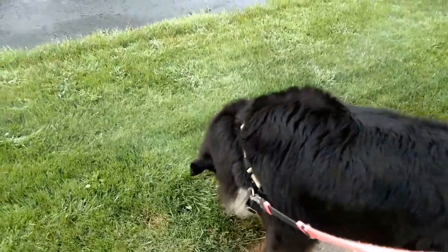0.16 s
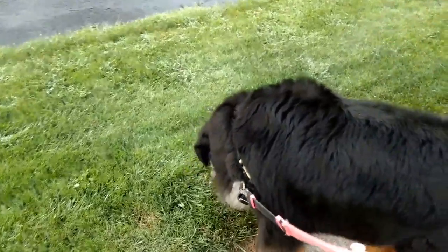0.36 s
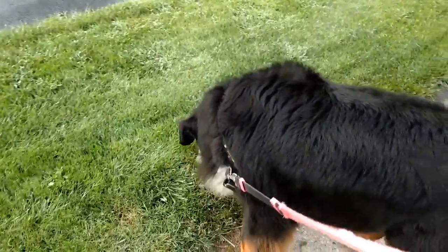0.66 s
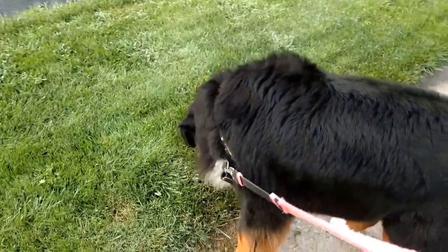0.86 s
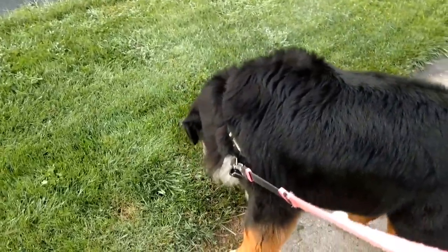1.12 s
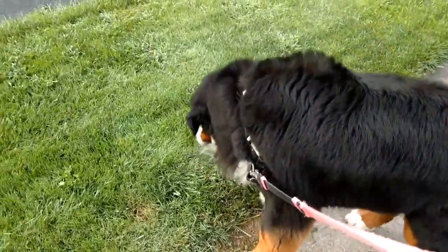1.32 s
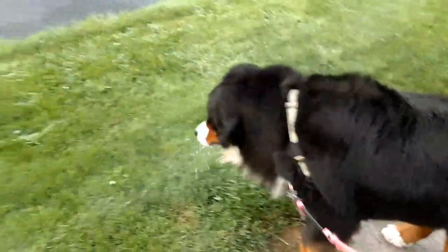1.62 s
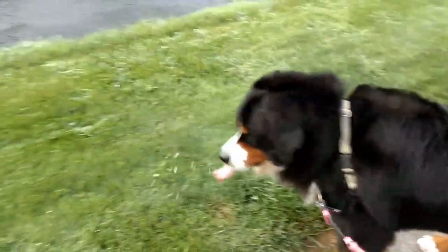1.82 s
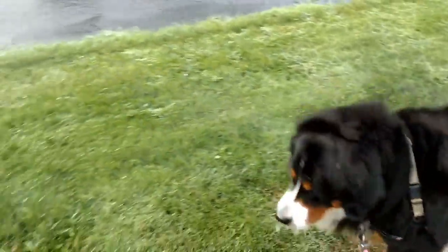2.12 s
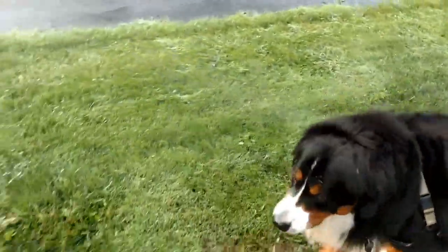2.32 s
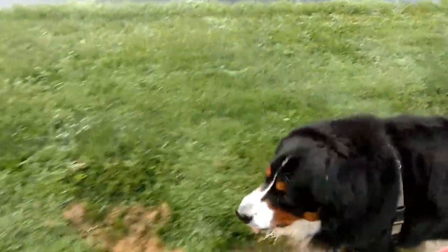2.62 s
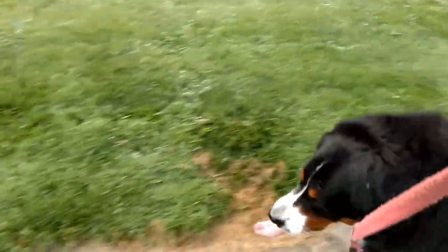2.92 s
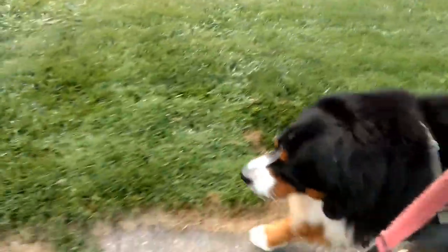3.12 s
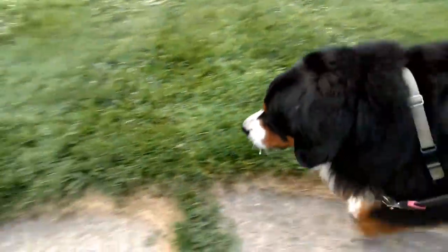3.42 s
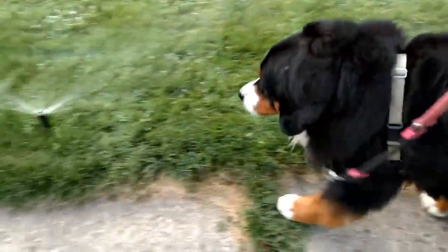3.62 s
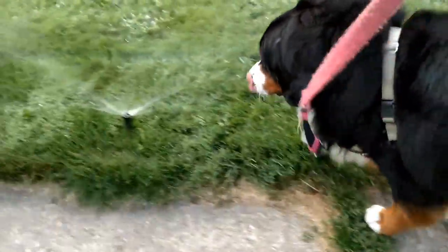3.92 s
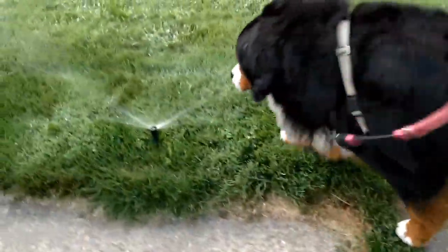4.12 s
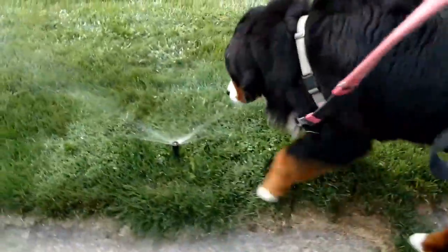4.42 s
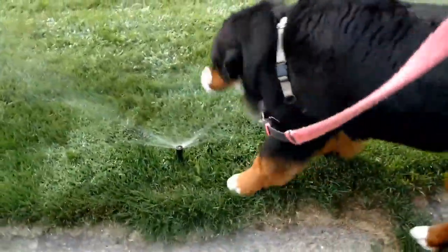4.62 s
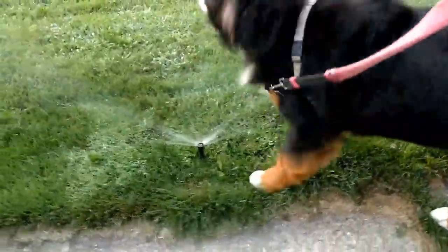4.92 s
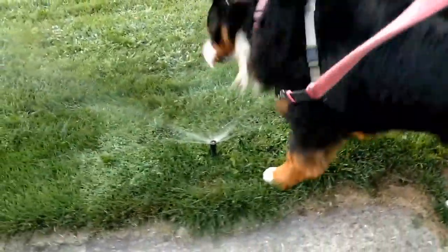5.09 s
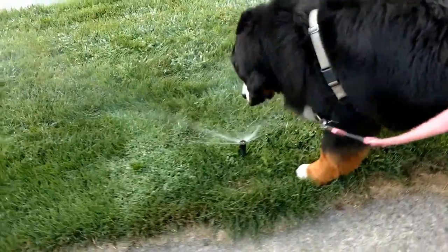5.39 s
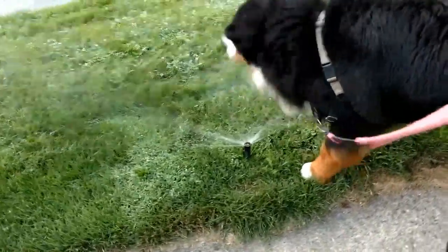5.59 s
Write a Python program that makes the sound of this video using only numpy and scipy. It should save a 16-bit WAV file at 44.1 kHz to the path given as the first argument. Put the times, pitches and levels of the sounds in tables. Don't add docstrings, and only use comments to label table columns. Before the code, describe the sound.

Close handheld stereo pickup of fine sprinkler spray, a constant airy hiss that starts toward the left and moves to the centre as the microphone turns. Early on, wet mouth plops, gurgles and dry snaps from a dog drinking; then wind bumps and handling thuds, sparse footfalls, and finally several bright, thin tag rattles. Distant traffic hums softly below.

```python
import sys
import numpy as np
from scipy import signal
from scipy.fft import rfft, irfft, next_fast_len
from scipy.io import wavfile

SR = 44100
rng = np.random.default_rng(int(sys.argv[2]) if len(sys.argv) > 2 else 0)


def how_loud(loudness_db):
    steps = np.asarray(loudness_db, float) / 20
    return 10 ** steps


def log_audio(samples):
    frames = np.atleast_2d(samples).T
    limited = np.clip(frames, -1, 1)
    pcm = np.round(limited * 32767).astype(np.int16)
    wavfile.write(sys.argv[1], SR, pcm)


N = 253575
FRAME_HZ = np.fft.rfftfreq(512, 1 / SR)[:, None]
FRAME_S = np.arange(N // 128 + 2) * 128 / SR
STEER_MS = 0.463


def curves(rows, at_s):
    s, *columns = np.transpose(rows)
    return [np.interp(at_s, s, c) for c in columns]


def in_time(rows):
    return curves(rows, np.arange(N) / SR)


def in_frames(rows):
    return curves(rows, FRAME_S)


def swells(rows, s):
    at, half, *lifts = np.transpose(rows)
    bells = np.exp(-((s[:, None] - at) / half) ** 2)
    return [bells @ db for db in lifts]


def at_hz(points, hz):
    points = np.array(points)
    return np.interp(np.log(hz + 1), np.log(points[:, 0]), points[:, 1])


def bump(hz, width):
    return np.exp(-(np.log((FRAME_HZ + 1) / hz) / width) ** 2)


def rms_one(x):
    return x / np.sqrt(np.mean(x ** 2) + 1e-20)


def drift(rate):
    r = np.exp(-80 * np.pi * rate / SR)
    slow = signal.lfilter([1], [1, -2 * r, r * r], rng.standard_normal(N // 40 + 2002))[2000:]
    return np.interp(np.arange(N) / 40, np.arange(len(slow)), rms_one(slow))


def ring(clicks, hz, t60):
    r, w = how_loud(-60 / (t60 * SR)), 2 * np.pi * hz / SR
    return signal.lfilter([0, np.sin(w)], [1, -2 * r * np.cos(w), r * r], clicks + 1e-18)


def grainy(size, spread_db):
    sizes_db = spread_db * np.clip(rng.standard_normal(size), -3.0, 3.0)
    return rms_one(rng.standard_normal(size) * how_loud(sizes_db))


# (f/Hz, coherence 0-1)
LIKENESS = [(40, 1), (100, 0.98), (200, 0.97), (330, 0.93), (800, 0.28), (1500, 0.43), (3000, 0.08),
            (6000, 0.26), (12000, 0)]


def diffuse(spread_db):
    mid, side = rfft(grainy((2, N), spread_db))
    alike = np.clip(at_hz(LIKENESS, np.fft.rfftfreq(N, 1 / SR)), 0, 1)
    ports = np.sqrt(1 + alike) * mid + np.sqrt(1 - alike) * side * [[1], [-1]]
    return irfft(ports, N) / np.sqrt(2)


# (t/s, left port lead/ms, direct share 0-1, ground echo delay/ms)
BEARING = [(0, 0.41, 0.52, 0.11), (1.9, 0.4, 0.39, 0.16), (2.7, 0.39, 0.56, 0.18), (3.1, 0.31, 0.64, 0.16),
           (3.5, 0.19, 0.5, 0.26), (3.62, 0.14, 0.74, 0.77), (3.77, 0.068, 0.54, 0.72),
           (4.25, 0.051, 0.35, 0.69), (4.4, 0.018, 0.4, 0.624), (4.75, -0.039, 0.44, 0.54),
           (5.0, -0.029, 0.58, 0.23), (5.75, -0.084, 0.88, 0.13)]
# (f/Hz, level/dB)
SCATTER = [(1500, -3.5), (6000, -3.5), (8000, 2), (15000, 4)]


def from_nozzle(spread_db, echo=0.18):
    lead_ms, share, echo_ms = in_time(BEARING)
    size = next_fast_len(N + 200)
    fine = signal.resample(grainy(size, spread_db), 4 * size)

    def late(ms):
        return np.interp(4 * (np.arange(N) + 100 - ms * SR / 1000), np.arange(len(fine)), fine)

    ports = []
    for side in (-1, 1):
        delay_ms = side * lead_ms / 2
        ports.append(late(delay_ms) + echo * late(delay_ms + echo_ms))
    share = np.clip(share, 0, 1)
    tilt = how_loud(at_hz(SCATTER, np.fft.rfftfreq(N, 1 / SR)))
    scattered = irfft(rfft(diffuse(spread_db)) * tilt, N)
    return np.sqrt(share) * rms_one(np.array(ports)) + np.sqrt(1 - share) * scattered


def coloured(white, gain, gusty_db):
    frames = signal.stft(white, nperseg=512, noverlap=384)[2]
    frames = frames * gain[..., :frames.shape[-1]]
    shaped = signal.istft(frames, nperseg=512, noverlap=384)[1][:, :N]
    return shaped * how_loud(gusty_db * (drift(3.75) + 0.6 * drift(50)))


def patches(spectrum, patchy_db, count):
    ends = [spectrum[0][0], spectrum[-1][0]]
    place = np.interp(np.log(FRAME_HZ + 1), np.log(ends), [0, count - 1])
    at = np.minimum(np.arange(len(FRAME_S)) * 128, N - 1)
    flicker = 0
    for k in range(count):
        band = np.clip(1 - abs(place - k), 0, 1)
        flicker = flicker + band * (drift(1.7) + drift(29.0))[at]
    shape_db = at_hz(spectrum, FRAME_HZ)
    return shape_db - 10 * np.log10(np.mean(how_loud(2 * shape_db))) + patchy_db * flicker


# (t/s, level/dB)
SPRAY = [(0, -43.5), (0.7, -43.5), (1.07, -47), (1.4, -43.5), (2.24, -43), (3.38, -39), (4.1, -41.5),
         (4.6, -39), (5.75, -38.5)]
# (f/Hz, density/dB per Hz)
MIST = [(5000, -10.5), (6500, -3.5), (7500, -3.5), (8300, 0.5), (9500, -1), (11000, -1), (12000, -2),
        (13300, -0.5), (14500, -0.5), (15200, 0), (16500, 2)]
# (f/Hz, density/dB per Hz)
SPLASH = [(1200, 4), (1800, 2), (2300, -1), (3000, 1.5), (3700, 3), (4300, 3), (5300, -2.5), (6300, -6.5),
          (7500, -7), (9000, -30)]
# (t/s, half length/s, splash lift/dB, patter lift/dB)
SWEEPS = [
    (0.25, 0.41, 0.5, 1),
    (0.75, 0.45, 5, -6.5),
    (1.2, 0.28, -3.5, 7.5),
    (1.45, 0.31, 7, -6.5),
    (2.0, 0.48, 0.5, 4.5),
    (2.62, 0.16, -1, 1),
    (3.05, 0.27, 2, 1),
    (3.75, 0.19, 4, 0),
    (4.23, 0.33, 3, 2.5),
    (4.68, 0.066, 3.5, 0),
]
# (t/s, f/Hz, lift/dB)
LOBE = [(0, 7600, -6), (0.6, 7550, -3), (1.6, 7500, -1.5), (3.65, 8400, -4), (3.85, 7800, 7),
        (4.0, 8000, 10), (4.3, 7900, 7.5), (4.5, 8050, 6), (4.7, 7800, 6), (5.2, 7600, 3), (5.75, 8200, -3)]
SECOND_LOBE = [(0, 10100, 4.5), (0.7, 9800, 2), (1.7, 9800, 5), (2.45, 9350, 2.5), (2.95, 8800, -3),
               (3.35, 9300, 0), (3.75, 9700, 8), (4.0, 9400, 2.8), (4.3, 9400, 5), (5.75, 9500, -1)]
THIRD_LOBE = [(0, 11800, 1), (1.2, 11200, 2.5), (1.8, 12000, 3.5), (2.6, 11700, 6), (2.9, 11900, 4),
              (3.15, 11400, 7.5), (3.3, 11500, 2.5), (3.45, 11100, 4.5), (3.85, 11000, 5), (4.1, 11000, 0),
              (4.5, 11000, 7.5), (4.8, 11000, 3), (5.75, 11600, -3)]
TOP_LOBE = [(0, 12600, 3), (0.9, 13700, 5.5), (1.3, 13700, 5), (1.85, 13400, 3), (2.4, 12900, 0),
            (2.7, 13000, 2), (2.9, 13800, 4), (3.25, 14300, 0), (3.6, 13000, -2.5), (3.95, 12600, 0),
            (4.7, 12600, 5), (5.75, 13200, -4)]
# (t/s, left-right level in the lower shadow/dB)
GRIP = [(0, 7), (0.9, 11), (1.55, 14), (1.85, 5.5), (3.0, 8), (3.3, 4), (4.7, 5.5), (5.75, 8.5)]


def spray():
    (mist_db,), (lower_db,) = in_frames(SPRAY), in_frames(GRIP)
    splash_db = -48.5 + swells(SWEEPS, FRAME_S)[0]
    upper_db = -2.5 + 9 * in_frames(BEARING)[0]
    lobes_db = 0
    for rows in (LOBE, SECOND_LOBE, THIRD_LOBE, TOP_LOBE):
        hz, lift_db = in_frames(rows)
        lobes_db = lobes_db + lift_db * bump(hz, 0.046)
    mist = how_loud(2 * (patches(MIST, 0.54, count=9) + mist_db + 3.0 + lobes_db))
    splash = how_loud(2 * (patches(SPLASH, 1.85, count=7) + splash_db - 0.5))
    shade_db = lower_db * bump(6530, 0.43) + upper_db * bump(12000, 0.23)
    gain = np.sqrt(mist + splash) * how_loud(np.multiply.outer([0.7, -0.7], shade_db))
    return coloured(from_nozzle(2.3), gain, gusty_db=1.02)


# (f/Hz, density/dB per Hz)
PATTER = [(150, -24), (280, 0.5), (450, -3.5), (800, -4.5), (1400, -10), (1800, -9.5), (2400, -33),
          (3200, -43)]
# (f/Hz, density/dB per Hz)
HUM = [(25, -8), (45, -14), (65, 1.5), (95, -0.5), (140, -2.5), (200, -5), (300, -16), (450, -33.5)]
# (t/s, half length/s, breeze lift/dB, far hum lift/dB)
GUSTS = [
    (1.1, 0.33, -2, 0.5),
    (2.72, 0.15, 13.5, 3),
    (2.86, 0.044, 13, 1),
    (2.98, 0.075, 18.5, 2),
    (3.4, 0.35, 4, 2.5),
    (4.0, 0.35, -7, 0.5),
    (4.7, 0.074, -13, 1),
]


def surroundings():
    (mist_db,) = in_frames(SPRAY)
    hum_db = -54 + swells(GUSTS, np.arange(N) / SR)[1]
    hum = irfft(rfft(diffuse(0)) * how_loud(at_hz(HUM, np.fft.rfftfreq(N, 1 / SR))), N)
    hum = rms_one(hum) * how_loud(hum_db + 10.5 + 0.087 * drift(6.1))
    follow_db = 0.67 * (mist_db - mist_db[0])
    patter_db = -48.5 + follow_db + swells(SWEEPS, FRAME_S)[1]
    patter = how_loud(patches(PATTER, 1.93, count=7) + patter_db - 3.5)
    return hum * how_loud([[0.6], [-0.6]]) + coloured(diffuse(5.2), patter, gusty_db=0.54)


def breeze():
    band = signal.butter(2, [45, 115], "band", fs=SR, output="sos")
    low = signal.sosfilt(band, rng.standard_normal((2, N)))
    gust_db = swells(GUSTS, np.arange(N) / SR)[0]
    return rms_one(low) * how_loud(-60.5 + gust_db + 2.0 * drift(6.3) + np.array([[0.8], [-0.8]]))


def knocks(rows, swell_s, rough, trim_db):
    out, t = np.zeros((2, N + 2048)), np.arange(2048) / SR
    noises = rng.standard_normal((len(rows), 2, 2048))
    tilts = rng.normal(0, 0.39, (len(rows), 1))
    for (s, peak_db, hz, t60), noise, tilt in zip(rows, noises, tilts):
        shape = (1 - np.exp(-t / swell_s)) * how_loud(-60 * (t / t60) ** 0.98)
        band = signal.butter(1, [0.73 * hz, 1.43 * hz], "band", fs=SR, output="sos")
        grit = rms_one(signal.sosfilt(band, noise))
        tone = (-np.sin(2 * np.pi * hz * t) + rough * grit) * shape / shape.max()
        thinning = 2 * abs(np.sin(np.pi * hz * STEER_MS / 1000)) + 0.66
        at = round((s + 0.001014) * SR)
        out[:, at:at + 2048] += how_loud(peak_db + trim_db) / thinning * tone * how_loud(tilt * [[1], [-1]])
    return out[:, :N]


# (t/s, peak level/dB, f/Hz, t60/s)
PLOPS = [(0.104, -30.5, 330, 0.012), (0.179, -45, 420, 0.012), (0.369, -36, 640, 0.018),
         (0.426, -35, 950, 0.026), (0.468, -34, 1090, 0.025), (0.641, -26.5, 536, 0.011),
         (0.669, -34, 770, 0.025), (0.753, -30, 664, 0.021), (0.946, -35, 620, 0.015),
         (0.992, -32, 781, 0.022), (1.042, -21, 728, 0.011), (1.005, -35.5, 1440, 0.018),
         (1.268, -36, 446, 0.041), (1.326, -30, 314, 0.018), (1.543, -37.5, 1220, 0.028),
         (1.631, -32.5, 1015, 0.029), (1.701, -15, 902, 0.012), (2.325, -33, 484, 0.016),
         (2.373, -27.5, 1434, 0.028), (2.631, -21.5, 486, 0.013), (2.705, -24, 516, 0.021),
         (2.752, -28, 356, 0.018), (2.793, -29, 820, 0.014), (2.948, -33, 530, 0.021),
         (3.2, -33.5, 466, 0.011), (4.782, -26, 666, 0.015), (5.008, -33, 643, 0.037),
         (5.688, -39, 550, 0.017)]
# (t/s, peak level/dB, f/Hz, t60/s)
SNAPS = [(0.732, -44, 670, 0.0053), (1.0705, -35, 3200, 0.003), (1.209, -22.5, 1370, 0.005),
         (1.2092, -34.5, 3200, 0.003), (1.1712, -33, 1240, 0.0033), (2.033, -24, 1250, 0.0045),
         (2.035, -36.5, 3000, 0.0067), (2.0348, -28, 1300, 0.0061), (2.0385, -30, 1010, 0.008),
         (3.66, -32, 350, 0.011), (4.1095, -23.5, 630, 0.013), (4.114, -33, 900, 0.006),
         (3.9, -28, 388, 0.005), (4.4122, -21.5, 1400, 0.0048), (4.4152, -21, 1340, 0.0062),
         (4.4414, -26, 1550, 0.0033), (4.4416, -32, 3100, 0.0033), (4.4465, -29, 1400, 0.005),
         (4.797, -19.5, 2560, 0.0063), (4.7965, -29, 3400, 0.004), (5.3, -27, 700, 0.0072),
         (5.3, -28, 1500, 0.0081), (4.8805, -23, 1540, 0.014), (4.8835, -22.5, 1800, 0.014),
         (5.7095, -23.5, 730, 0.011), (1.337, -40, 420, 0.0078), (5.19, -32, 900, 0.0023),
         (2.3735, -35, 1700, 0.008), (2.337, -32, 600, 0.01), (2.4005, -32, 700, 0.0023)]
# (t/s, peak level/dB, f/Hz, t60/s)
STRIKES = [
    (1.1712, -24.5, 1340, 0.0012),
    (1.174, -32.5, 3280, 0.0044),
    (2.1617, -29.5, 2600, 0.0029),
    (3.52, -45, 298, 0.011),
    (3.555, -30, 2800, 0.0026),
    (3.605, -30, 1720, 0.012),
    (4.11, -29, 3040, 0.0076),
    (4.8, -25, 1150, 0.0028),
    (5.01, -26, 1550, 0.0024),
    (5.69, -33, 328, .008),
]


def plops():
    wet = knocks(PLOPS, swell_s=0.011, rough=0.21, trim_db=0.5)
    dry = knocks(SNAPS, swell_s=0.0001, rough=0.36, trim_db=6.0)
    strikes = knocks(STRIKES, swell_s=0.0003, rough=0.3, trim_db=4.0)
    return wet + dry + strikes * [[1.6], [0.3]]


# (t/s, peak level/dB, centre f/Hz, half length/s)
SQUIRTS = [(0.322, -42, 5670, 0.017), (0.587, -41.5, 5860, 0.052), (0.804, -37, 5830, 0.023),
           (1.233, -34, 5050, 0.023), (1.254, -41.5, 7500, 0.044), (0.386, -39, 650, 0.031),
           (0.453, -37, 905, 0.022), (0.482, -38, 1060, 0.012), (0.71, -37.5, 900, 0.014),
           (.97, -34.5, 640, 0.073), (1.011, -39.5, 1440, 0.014), (1.472, -39, 1880, 0.011),
           (2.355, -30.5, 447, 0.051), (4.985, -32, 4140, .005), (2.017, -36.5, 2700, 0.0054),
           (2.329, -41.5, 5500, 0.004), (1.945, -40.5, 5400, 0.006), (5.66, -33, 4450, 0.0049)]
# (t/s, peak level/dB, centre f/Hz, half length/s)
BRUSHES = [
    (1.279, -36, 1660, 0.013),
    (4.789, -33.5, 1010, 0.0061),
    (4.796, -29.5, 5970, 0.0026),
    (5.012, -25.5, 1300, 0.0022),
    (5.198, -34, 7000, 0.0025),
]


def muzzle():
    power = 0
    for rows, width in ((SQUIRTS, 0.17), (BRUSHES, 0.54)):
        for s, db, hz, half in rows:
            burst = np.exp(-((FRAME_S - s) / half) ** 2)
            power = power + how_loud(2 * (db + 3.5)) * bump(hz, width) * burst
    ahead = grainy(N, 2.4) + how_loud(-15) * rng.standard_normal((2, N))
    return coloured(ahead, np.sqrt(power), gusty_db=1.5)


# (t/s, peak level/dB, f/Hz, t60/s)
BUBBLES = [
    (.388, -39, 720, .02),
    (.482, -36, 1050, 0.023),
    (.596, -41, 674, .02),
    (.695, -35, 700, .025),
    (.696, -39, 1030, .015),
    (1.0, -35, 875, .015),
    (1.022, -43, 1300, .025),
    (4.7985, -31, 3070, .012),
    (4.799, -24, 1460, 0.0087),
    (4.801, -32, 2540, 0.015),
]
# (t/s, peak level/dB, f/Hz, t60/s)
TICKS = [(1.217, -38, 5500, .003), (1.2365, -35, 5200, .004), (1.2462, -31, 5400, .003),
         (1.597, -30, 6000, 0.0037), (4.7965, -26, 9000, 0.0044), (4.8035, -30, 11000, .004),
         (4.8385, -37, 10000, .005), (4.864, -33, 8900, 0.0054), (4.977, -32, 8900, .004),
         (4.993, -37, 8500, .005), (5.0567, -43, 8000, .004), (5.139, -40, 8400, .004),
         (5.191, -36, 5200, .003), (5.1972, -26, 10000, .004), (5.2065, -30, 11000, .004),
         (5.214, -38, 14000, .004), (5.6548, -32, 10900, .004), (5.6585, -32, 10000, .004),
         (5.6708, -33, 11100, .004)]
# (t/s, peak level/dB, f/Hz, t60/s)
PAWS = [(4.779, -38, 424, 0.017), (4.836, -29, 540, 0.014), (4.838, -30, 1390, .008),
        (4.863, -31, 1500, .012), (4.918, -34.5, 310, 0.026), (4.975, -43, 720, .012),
        (5.0095, -28, 1300, 0.0055), (5.0115, -33, 710, .008), (5.016, -32, 300, .015),
        (5.121, -31.5, 285, 0.022), (1.268, -39, 400, .008)]
# (t/s, peak level/dB, mode f/Hz, t60/s)
PINGS = [(4.803, -38, 11900, .04), (4.887, -40, 12000, .03), (4.9155, -37, 14930, .05),
         (4.946, -40, 11900, .04), (4.9675, -28, 11920, .03), (4.968, -31, 14650, .035),
         (4.968, -38, 10470, .025), (4.957, -38, 14900, .03), (5.066, -37, 12100, .04),
         (5.067, -43, 10500, .08), (5.067, -42, 14730, .044), (5.131, -41, 14800, .04),
         (5.139, -38, 12110, 0.11), (5.672, -31, 11810, .09), (5.6712, -30, 10450, .025),
         (5.733, -44, 11900, .04)]


def contacts():
    bubbles = knocks(BUBBLES, swell_s=0.002, rough=0.16, trim_db=3.5)
    ticks = knocks(TICKS, swell_s=0.0001, rough=2.6, trim_db=2.0)
    paws = knocks(PAWS, swell_s=0.001, rough=0.37, trim_db=5.0)
    pings = knocks(PINGS, swell_s=0.0004, rough=0.06, trim_db=8.5)
    return bubbles + ticks + paws + pings


# (t/s, peak level/dB, membrane f/Hz)
PORT_HITS = [
    (2.1635, -13, 350),
    (2.1633, -18.5, 950),
    (2.4019, -19.5, 360),
    (5.689, -27, 342),
]


def port_hits():
    out, t = np.zeros((2, N + 1024)), np.arange(1024) / SR
    for s, peak_db, hz in PORT_HITS:
        at = round(s * SR)
        decay = np.exp(-(hz * t / 0.57) ** 2.4)
        out[1, at:at + 1024] -= how_loud(peak_db) * np.sin(2 * np.pi * hz * t) * decay
    return out[:, :N]


# (t/s, peak level/dB)
THUMPS = [
    (2.665, -48),
    (2.719, -50),
    (2.85, -47),
    (2.972, -57),
    (3.081, -31.5),
    (4.764, -58),
    (4.88, -49),
]


def thumps():
    clicks = np.zeros(N)
    clicks[[round(s * SR) for s, db in THUMPS]] = how_loud(np.array(THUMPS)[:, 1] + 25.5)
    return ring(ring(clicks, 90, 0.046), 126, 0.066) / 300 * [[1.3], [0.25]]


# (t/s, ringing level/dB, dull knock level/dB, loudest mode f/Hz)
TAGS = [(4.7971, -20.5, -19.5, 8300), (4.7975, -21, -38, 15000), (4.8024, -22, -25, 15000),
        (4.8035, -26, -55, 11900), (4.8375, -30, -54, 15000), (4.863, -24, -38, 9000),
        (4.887, -33, -55, 12100), (4.9157, -26, -55, 15000), (4.921, -28, -55, 15000),
        (4.947, -30, -51, 12000), (4.946, -25, -55, 10600), (4.9465, -29, -55, 15000),
        (4.958, -28, -52, 15000), (4.966, -20, -49, 12100), (4.968, -22, -55, 14700),
        (4.967, -31, -55, 10600), (4.9784, -23, -42, 12100), (4.982, -29, -38, 14700),
        (4.992, -17, -47, 9130), (5.0569, -31, -55, 9300), (5.066, -28, -55, 12100),
        (5.068, -27, -55, 10700), (5.07, -33, -55, 15000), (5.129, -36, -55, 12100),
        (5.132, -29, -55, 15000), (5.139, -27, -44, 11900), (5.196, -20, -32, 14700),
        (5.199, -19.5, -47, 8300), (5.2, -20, -50, 14100), (5.205, -17, -40, 14700),
        (5.653, -24, -31, 14100), (5.657, -17, -23.5, 14700), (5.67, -20.5, -53, 10760),
        (5.671, -26, -55, 15000), (5.674, -24, -50, 11900), (5.733, -32, -52, 12000),
        (5.743, -33, -30, 13400)]
# (f/Hz, level/dB, t60/s)
TAG_MODES = [(6560, 13, 0.035), (8300, 2, 0.022), (10480, 0.5, 0.017), (11900, -4.5, 0.042),
             (12100, 4.5, 0.019), (14100, -4, 0.022), (14700, 1.5, 0.026), (15000, -2, .035)]


def tags():
    out = np.zeros((2, N + 4096))
    phase = np.arange(4096) / SR / 0.0014
    bright = signal.butter(2, 5500, "high", fs=SR, output="sos")
    dull = signal.butter(2, [2300, 4300], "band", fs=SR, output="sos")
    for s, ring_db, knock_db, contact_hz in TAGS:
        clicks = grainy(4096, 4.9) + 0.94 * grainy((2, 4096), 7.2)
        rattle = rms_one(clicks * phase * np.exp(1 - phase)) * 0.17
        metal = 0
        for hz, db, t60 in TAG_MODES:
            loss_db = 59 * abs(np.log(hz / contact_hz))
            metal = metal + how_loud(db - 23.0 - loss_db) * ring(rattle, hz, t60)
        hiss = how_loud(-10) * signal.sosfilt(bright, rattle)
        knock = how_loud(knock_db) * signal.sosfilt(dull, rattle)
        at = round(s * SR)
        out[:, at:at + 4096] += how_loud(ring_db) * (metal + hiss) + knock
    return out[:, :N]


def scene():
    near = plops() + muzzle() + contacts() + port_hits() + thumps() + tags()
    return spray() + surroundings() + breeze() + near


# (t/s, gain/dB)
GAIN = [(4.79, 0), (4.82, -6), (5.2, -4), (5.23, -11.5), (5.62, -6.5), (5.75, -4.5)]


def gain_control(dry):
    return dry * how_loud(in_time(GAIN)[0])


# (f/Hz, weight 0-1)
STEERING = [(100, 0.97), (5000, 0.86), (6600, 0.51), (7500, 0.4), (9000, 0.01), (15000, 0.01)]


def steer(pressure):
    size = next_fast_len(N + 64)
    hz, ports = np.fft.rfftfreq(size, 1 / SR), rfft(pressure, size)
    delay = np.exp(-2j * np.pi * hz * STEER_MS / 1000)
    other = np.clip(at_hz(STEERING, hz), 0, 1) * delay * ports[::-1]
    cut = how_loud(np.clip((15490 - hz) / 2, -80, 0))
    cut = cut / np.sqrt(1 + (32 / (hz + 1)) ** 6.5)
    return irfft((ports - other) * cut, size)[:, :N]


def band_limit(x):
    return signal.sosfilt(signal.butter(12, 16840, fs=SR, output="sos"), x)


def record(dry):
    mix = steer(gain_control(dry))
    return band_limit(mix)


dry = scene()
out = record(dry)
log_audio(out)
```